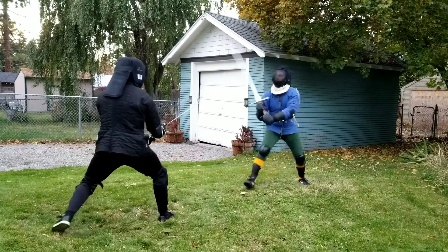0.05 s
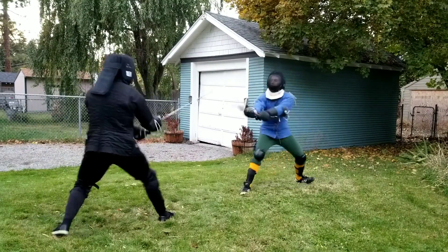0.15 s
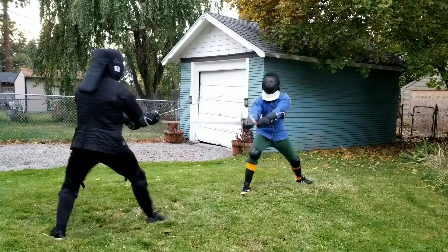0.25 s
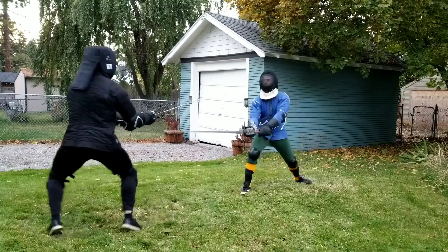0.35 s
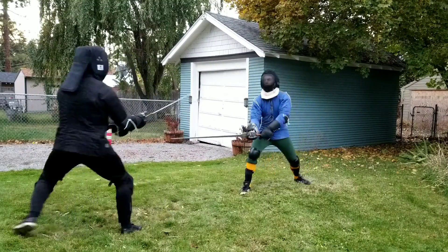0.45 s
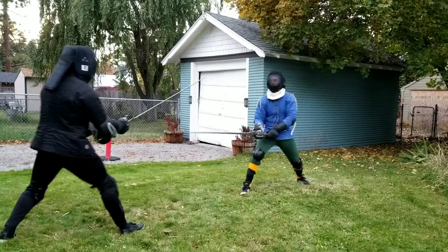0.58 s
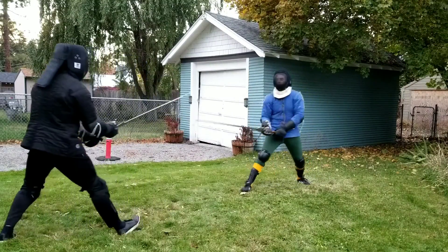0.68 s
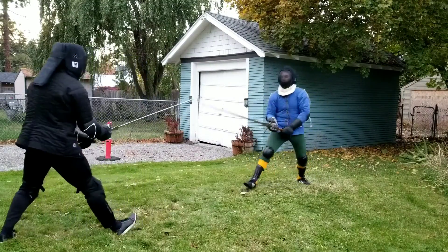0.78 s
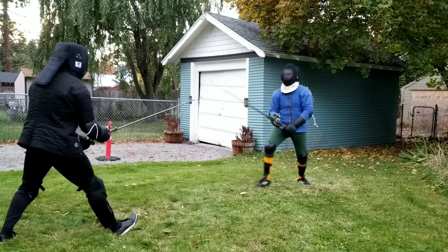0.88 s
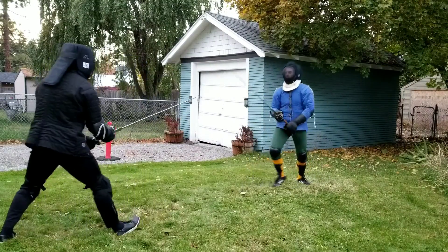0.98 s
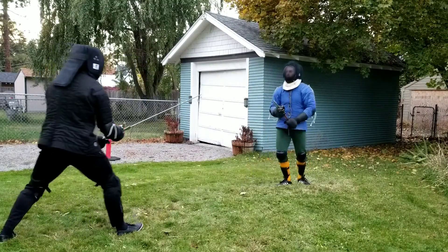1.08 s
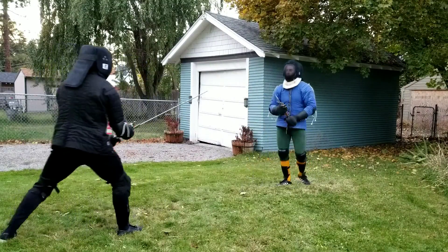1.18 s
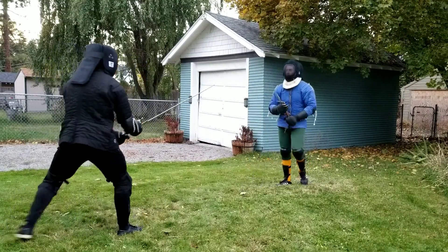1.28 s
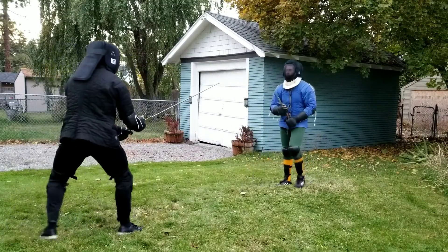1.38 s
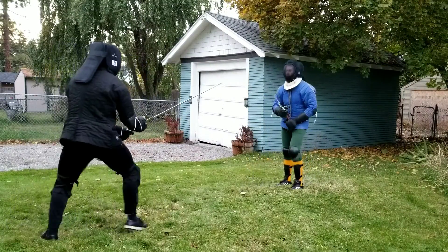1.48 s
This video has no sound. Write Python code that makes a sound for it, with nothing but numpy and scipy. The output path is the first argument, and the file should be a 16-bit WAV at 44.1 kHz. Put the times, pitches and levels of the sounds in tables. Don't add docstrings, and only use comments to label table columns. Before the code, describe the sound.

A steel sword clash at about 0.24 seconds: sharp double tick, tiny chattering slide and harder bind by 0.26, parting near 0.29. The bright ring dies within a few tenths, with a diffuse garage-wall echo. Soft turf steps fall at 0.08 and 0.22, a dull grip thud at 0.25, a faint plastic tick at 0.72, a faint step at 0.89. Distant traffic rumbles throughout, lowered after the clash.

```python
import sys
import numpy as np
from scipy import signal
from scipy.io import wavfile
from scipy.ndimage import uniform_filter1d

SR = 44100
rng = np.random.default_rng(int(sys.argv[2]) if len(sys.argv) > 2 else 0)


def inscribe(sig):
    pcm = np.round(np.clip(np.atleast_2d(sig).T, -1, 1) * 32767)
    wavfile.write(sys.argv[1], SR, pcm.astype(np.int16))


def boost_factor(decibels):
    exponent = np.asarray(decibels, float) / 20
    return 10 ** exponent


N = 66150


def level(x, db):
    return x * boost_factor(db) / np.sqrt(np.mean(x ** 2))


def read(table, hz):
    table_hz, values = np.array(table).T
    return np.interp(np.log(hz), np.log(table_hz), values)


def band(x, lo_hz, hi_hz):
    return signal.sosfilt(signal.butter(2, [lo_hz, hi_hz], "bandpass", fs=SR, output="sos"), x)


def lowpass(x, top_hz):
    return signal.sosfilt(signal.butter(1, top_hz, fs=SR, output="sos"), x)


def walk(rate):
    hold = int(SR / rate)
    steps = np.repeat(rng.standard_normal(200), hold)
    return 1.3 * uniform_filter1d(uniform_filter1d(steps, hold), hold)[:N]


def decay(since, t60):
    return np.exp(-np.log(1000) * since / t60)


def knocks(rows):
    force = np.zeros(N)
    at_s, db = np.array(rows).T
    force[(at_s * SR).astype(int)] = boost_factor(db) * np.sign(rng.standard_normal(len(rows)))
    return force


def thump(at_s, db, hz, t60):
    since = np.maximum(np.arange(N) / SR - at_s, 0)
    onset = 1 - np.exp(-since / .006)
    return boost_factor(db) * np.sin(2 * np.pi * hz * since) * onset * decay(since, t60)


def engine_drone():
    t = np.arange(N) / SR
    turns = np.cumsum(223.7 * (1 + 0.0158 * walk(5.83))) / SR
    passing = np.exp(-.5 * ((t - 1.16) / .08) ** 2)
    return np.sin(2 * np.pi * turns) * boost_factor(-40) * passing


def traffic():
    # frequency in Hz, level in dB per Hz.
    spectrum = [(25, -19.5), (48, 1.5), (210, -4.5), (400, -16), (1100, -11), (2300, -29), (4500, -41.5),
                (10000, -48.5)]
    # frequency in Hz, correlation (held to 0-1).
    likeness = [(60, 2.4), (250, 0.8), (600, 0.56), (1200, 0.34), (3000, -0.83)]
    # frequency in Hz, left minus right in dB.
    lean = [(40, -3.2), (200, -2.5), (1200, -6), (4000, -3), (12000, 6.5)]
    swell_db, flicker_db = 2.93, 1.0
    rumble, swell = 0, walk(1.5)
    for hz in 28 * 2 ** np.arange(0, 9.2, .5):
        mid, side = band(rng.standard_normal((2, N)), hz / 1.19, hz * 1.19)
        like = np.clip(read(likeness, hz), 0, 1)
        pair = np.sqrt(1 + like) * mid + np.sqrt(1 - like) * side * np.array([[1], [-1]])
        db = read(spectrum, hz) + swell_db * swell + flicker_db * walk(8)
        rumble = rumble + boost_factor(db + read(lean, hz) * np.array([[.5], [-.5]])) * pair
    hiss_hz = 13000
    hiss = level(band(rng.standard_normal((2, N)), hiss_hz * 0.99, hiss_hz * 1.1), -69.5)
    return level(rumble, -37.5) + hiss + engine_drone()


def footfalls():
    # start in seconds, level in dB, pitch in Hz.
    steps = [
        (.218, -32.5, 190),
        (0.078, -34, 43),
        (0.89, -42, 100),
    ]
    return sum(thump(at_s, db, hz, 0.05) for at_s, db, hz in steps)


def ticks():
    # start in seconds, level in dB.
    clicks = [
        (.718, -68),
    ]
    t = np.arange(400) / SR
    click = band(rng.standard_normal((2, len(t))) * np.exp(-t / 0.001543), 3500, 8700)
    return 10 * signal.fftconvolve(knocks(clicks)[None], click, axes=1)[:, :N]


def grip_thud():
    return thump(.246, -30.5, 581, 0.11)


def ring(force, modes):
    port_scatter_db, wobble_db = 4, 3
    t, out = np.arange(N) / SR, np.zeros((2, N))
    for (hz, db, t60), chance in zip(modes, rng.standard_normal((len(modes), 2))):
        keep = np.exp(-2 * np.log(1000) / (t60 * SR))
        swing = np.sqrt(signal.lfilter([1], [1, -keep], force ** 2))
        port_db = port_scatter_db * chance[0] * np.array([[.5], [-.5]])
        share = boost_factor(db + port_db + wobble_db * walk(45.9))
        port_phase = chance[1] * np.array([[0], [1]])
        out += share * swing * np.sin(2 * np.pi * hz * t + port_phase)
    return out


def steel(force):
    # frequency in Hz, level in dB, t60 in seconds.
    blade = [(2937, -5, 0.161), (4170, -5, .12), (4244, -11, .12), (5120, -6, .1), (5450, -6.5, 0.095),
             (5963, -6, 0.0993), (6290, -7, 0.089), (6750, 0, 0.097), (7620, -8, .08), (8120, -6.5, 0.082),
             (9700, -7.5, .08), (10974, -8, 0.091), (12620, -6, .09), (12900, -8.5, .08)]
    # frequency in Hz, level in dB, t60 in seconds.
    linger = [(3030, -16, .3), (3222, -13, .35), (3250, -16.5, 0.21), (3490, -13, .2), (3586, -13.5, 0.45),
              (3908, -9.5, .12), (4105, -15, .3), (4519, -13.5, .12), (5740, -10.5, .25), (7730, -12, .22),
              (10812, -16, .22)]
    # frequency in Hz, level in dB.
    crowd_levels = [(1500, -16.5), (2900, -7.5), (4100, -9), (5100, -11.5), (6600, -5.5), (9000, -7),
                    (12900, -4.5), (15000, -4.5)]
    t = np.arange(SR // 2) / SR
    crowd = 0
    for hz in 2000 * 2 ** (np.arange(13) / 4):
        t60 = 0.11 * (hz / 5000) ** -0.25
        burst = rng.standard_normal((2, len(t))) * decay(t, t60)
        crowd = crowd + boost_factor(read(crowd_levels, hz)) * band(burst, hz / 1.09, hz * 1.09)
    crack = band(rng.standard_normal((2, len(t))) * np.exp(-t / 0.00076), 2600, 16000)
    response = 10 * boost_factor(-4) * crowd + 10 * boost_factor(-1.5) * crack
    body = signal.fftconvolve(force[None], response, axes=1)[:, :N]
    body = body + boost_factor(-3.5) * ring(force, blade + linger)
    return signal.sosfilt(signal.butter(3, 2500, "highpass", fs=SR, output="sos"), body)


def edge_force():
    # start in seconds, strength in dB.
    contacts = [
        (.2363, -3.5),
        (.2414, -3.5),
        (.2440, -5),
        (.2515, -5.5),
        (.2537, -10),
        (.2585, -10.5),
        (.2630, -6.5),
        (.2652, -6),
        (.2810, -15.5),
    ]
    # time in seconds, level in dB.
    slide = [
        (.2335, -49),
        (.2365, -23.5),
        (.250, -21.5),
        (.264, -18),
        (.280, -25),
        (.290, -44),
    ]
    slips_per_s, scatter_db = 2500, 5
    timing, size = rng.random((2, N))
    direction = np.sign(size * 64 % 1 - .5)
    slips = (timing < slips_per_s / SR) * boost_factor(-scatter_db * np.log(size + 1e-9)) * direction
    pressure_db = np.interp(np.arange(N) / SR, *np.array(slide).T, left=-200, right=-200)
    return knocks(contacts) + slips * boost_factor(pressure_db)


def wall_echo(near):
    late = np.arange(SR) / SR - .015
    yard = rng.standard_normal((2, SR)) * (late > 0) * decay(late, 0.41)
    yard = lowpass(yard, 8920)
    yard = yard / np.sqrt(np.sum(yard ** 2, axis=1, keepdims=True))
    return boost_factor(-13.5) * signal.fftconvolve(near, yard, axes=1)[:, :N]


def clash():
    near = steel(edge_force())
    height = np.sqrt(np.mean(near[:, int(.24 * SR):int(.28 * SR)] ** 2))
    near = near * boost_factor(-12.5) / height
    near[1] = boost_factor(2) * lowpass(np.roll(near[1], int(.0003 * SR)), 7000)
    return near + wall_echo(near)


def scene():
    ground = traffic() + footfalls()
    bass = signal.sosfiltfilt(signal.butter(3, 473, fs=SR, output="sos"), ground)
    dip_s, dip_db, dip_width_s = .265, -21, 0.013
    dip = boost_factor(dip_db * np.exp(-.5 * ((np.arange(N) / SR - dip_s) / dip_width_s) ** 2))
    return clash() + grip_thud() + ticks() + ground - (1 - dip) * bass


def roll_off(x):
    return signal.sosfilt(signal.butter(12, 15300, fs=SR, output="sos"), x)


def record(dry):
    since = np.maximum(np.arange(N) / SR - 0.25, 0)
    duck_db = -4 * (1 - np.exp(-since / 0.04))
    settle_db = -4 * (1 - np.exp(-since / .2))
    ducked = dry * boost_factor(duck_db + settle_db)
    mix = signal.sosfilt(signal.ellip(12, .2, 70, 14300, fs=SR, output="sos"), ducked)
    return roll_off(mix)


dry = scene()
out = record(dry)
inscribe(out)
```